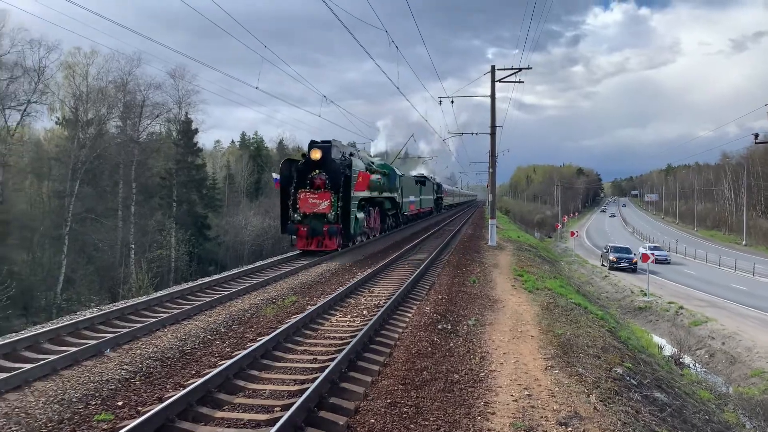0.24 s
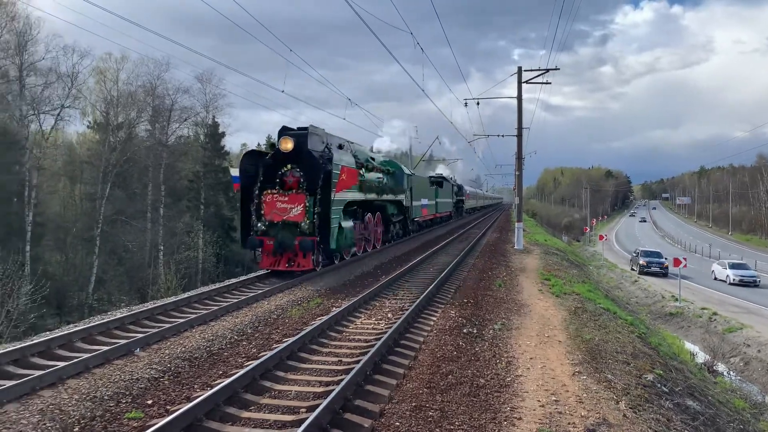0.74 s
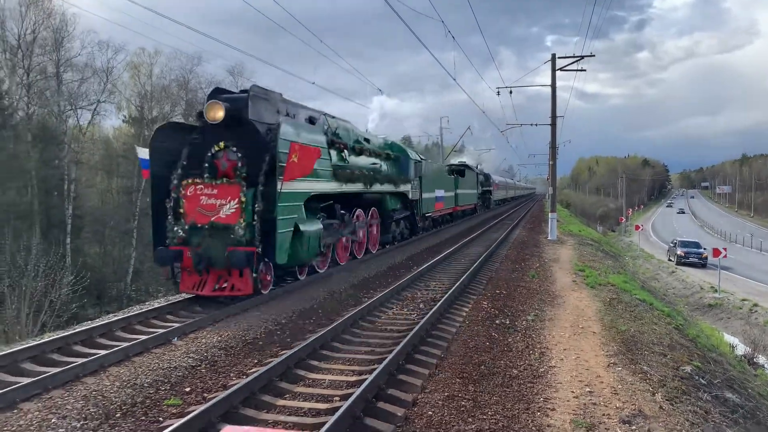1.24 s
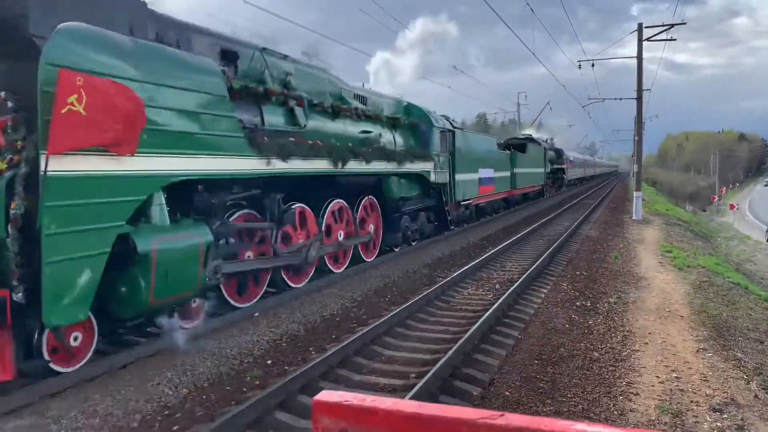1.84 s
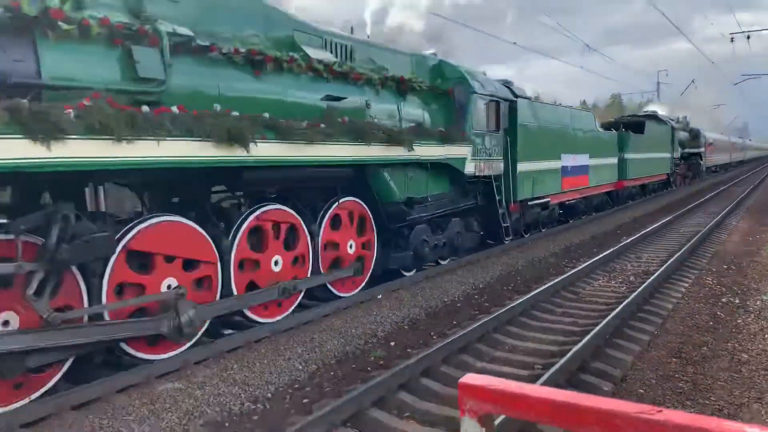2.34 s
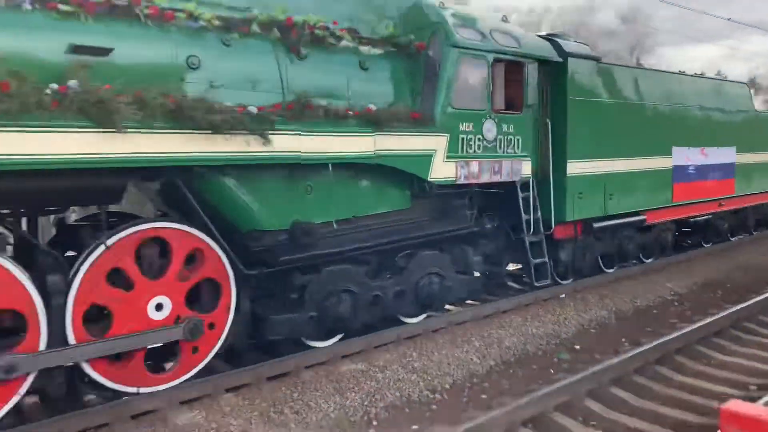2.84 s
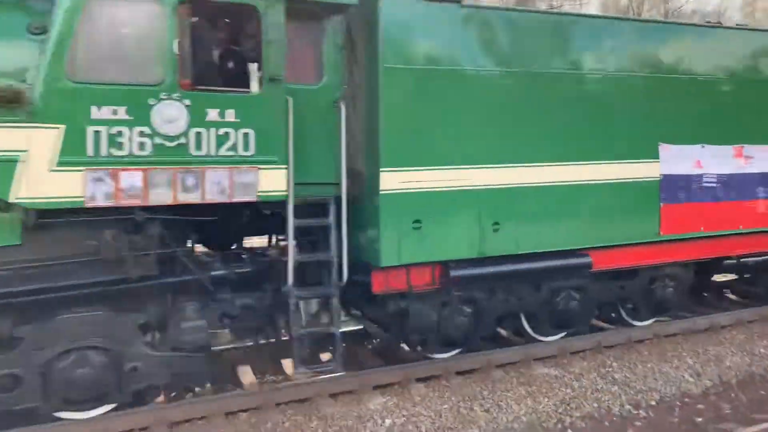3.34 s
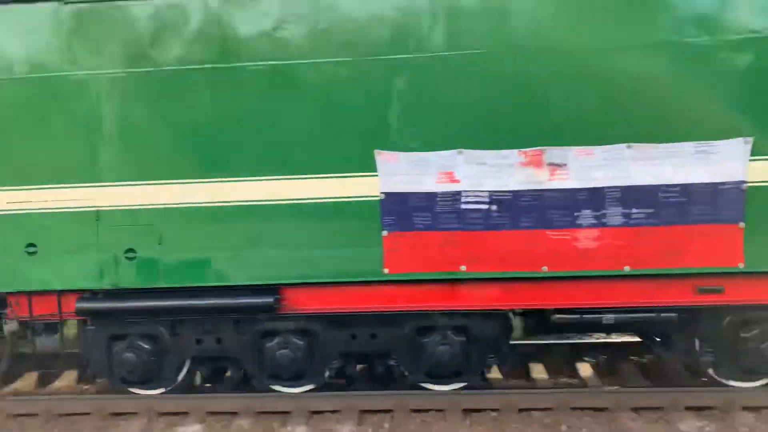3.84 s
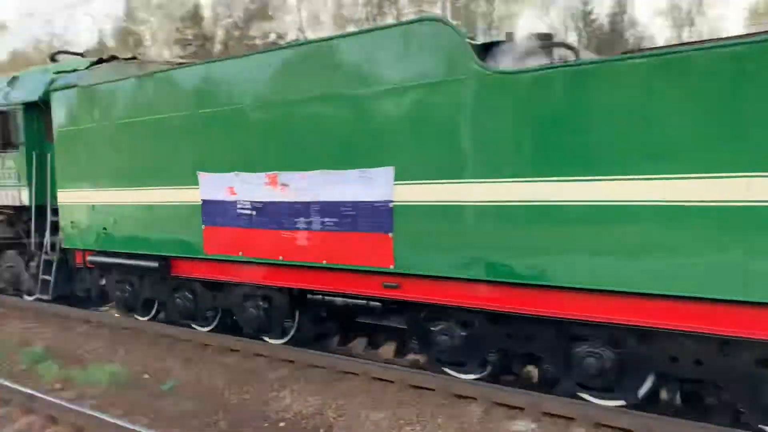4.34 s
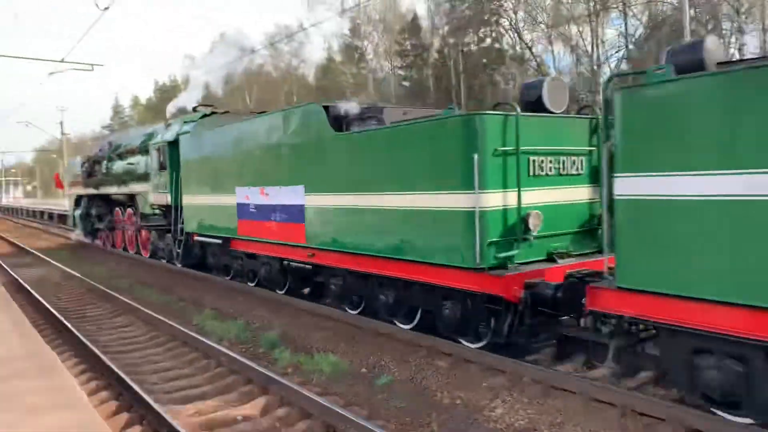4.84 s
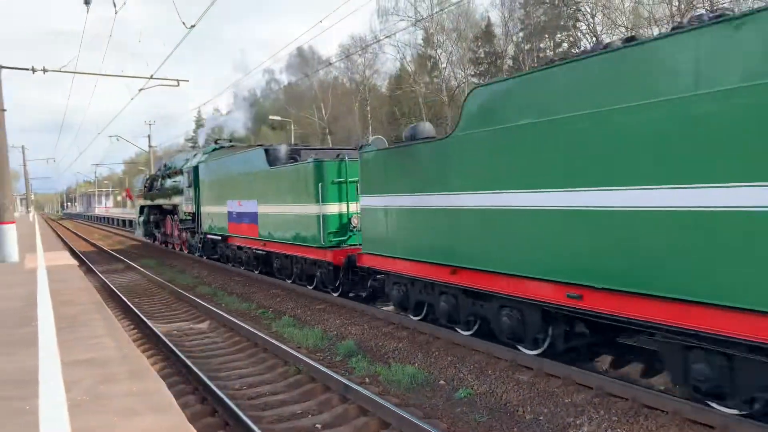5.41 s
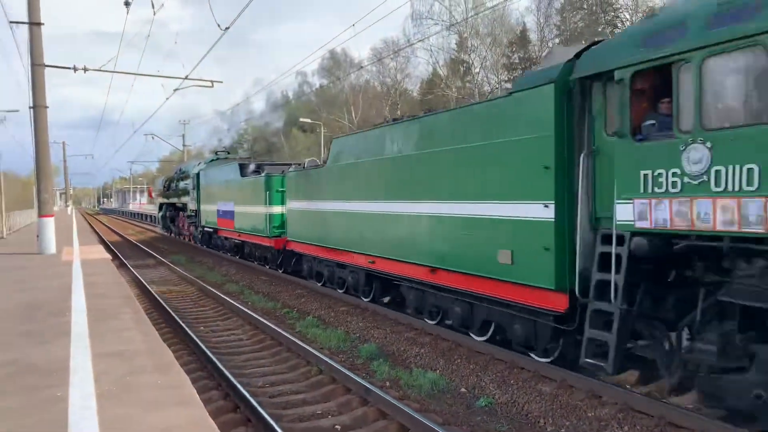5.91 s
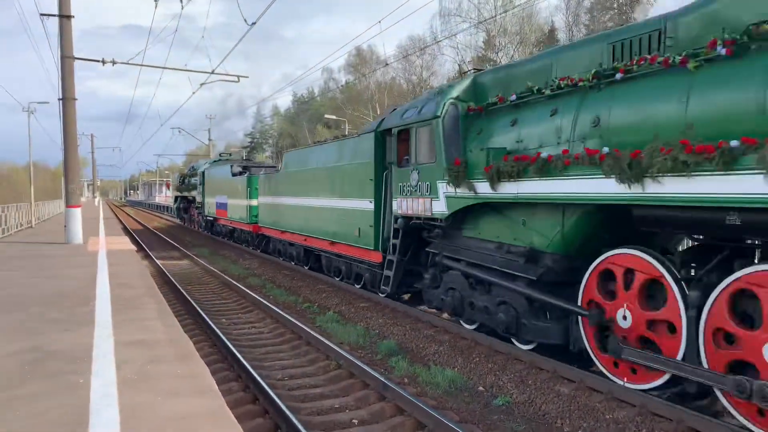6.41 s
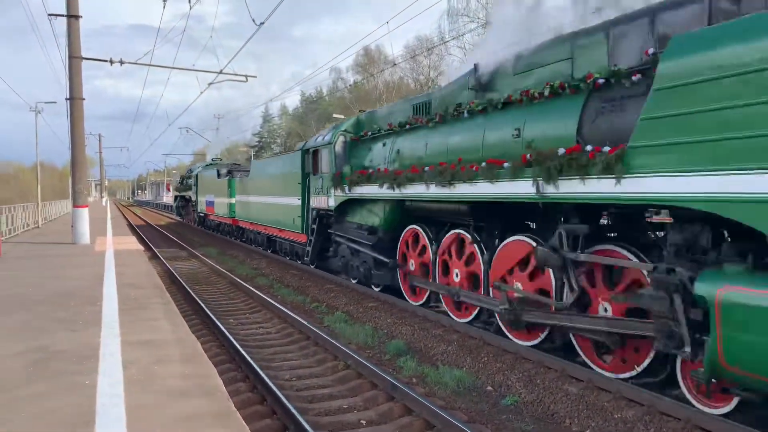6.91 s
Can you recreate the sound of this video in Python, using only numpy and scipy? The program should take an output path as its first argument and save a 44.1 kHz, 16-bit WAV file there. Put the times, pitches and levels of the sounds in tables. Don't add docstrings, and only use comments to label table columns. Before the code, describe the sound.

Open air by a railway platform, heard through a hand-held stereo phone turning with the train. At 0 s steam hiss is modest over a faint rumble, with a dull wheel thud almost at once. Uneven puffs build from 0.3 to 1.2 s, and the broadband hiss grows brighter and stronger toward 2.3 s. Rumble, rail hum and midrange rod clatter swell strongly; a sharp cluster of steam bursts lands around 2.5-2.6 s as the first driving wheels pass. From 3 to 5 s the sound stays dense: roaring steam, heavy rolling and irregular joint thuds, with a lower, fuller puff near 4.1 s and a broad one near 4.85 s. Another roaring puff comes around 5.8 s. Thuds bunch closely from 6.2 to 6.85 s as the second drivers clatter past, while the hiss recedes and the rolling eases by 7 s.

```python
import sys
import numpy as np
from scipy import signal
from scipy.io import wavfile
from scipy.ndimage import uniform_filter1d

SR = 44100
rng = np.random.default_rng(int(sys.argv[2]) if len(sys.argv) > 2 else 0)


def volts_from_db(level):
    exponent = np.asarray(level, float) / 20
    return 10 ** exponent


def materialize(psi):
    bounded = np.clip(np.atleast_2d(psi).T, -1, 1)
    quanta = np.round(bounded * 32767).astype(np.int16)
    wavfile.write(sys.argv[1], SR, quanta)


N = 315932

# time in seconds, lead of the jets at the left port in samples,
# lag of the wheels at the left port in samples.
PHONE_TURN = [(0.0, 4.3, 11), (0.6, 5.7, -2), (1.04, 7.7, -4), (1.55, 8.1, 2), (1.72, 11.9, 0),
              (2.09, 13.3, -0.6), (2.26, 18, -4), (2.44, 18, -3), (2.61, 20.8, -4.5), (3.48, 21.5, 0.5),
              (3.9, 20.1, 8), (4.35, 14, 14), (4.55, 11.9, 15.5), (4.78, 10.1, 15), (5.57, 7.93, 14),
              (6.1, 7.6, 19), (6.62, 8.7, 13.5), (7.16, 6.7, 10)]
# time in seconds, thud rise in dB, rail hum rise in dB, clatter rise in dB.
RAIL_JOINTS = [(0.092, 11.5, 9, -6), (0.569, 3.5, 1, 0.5), (0.735, 1, 7, 0), (1.46, -5, 4, 4),
               (1.878, 3.5, 5, 3), (2.28, -2, 4, 5.5), (2.72, 5, 3, 6.5), (2.889, 3.5, 4, 4.5),
               (3.17, -2, 6, 4), (3.751, 1, 6, -1.5), (4.005, 5, -0.1, 2.8), (4.29, 3, 7.5, 1.8),
               (4.761, 5, 4, 2), (5.482, 1, 1.5, 0.5), (5.796, 7.5, 2, -3), (6.24, 4, 6, 1.5),
               (6.385, 3, 5.5, -1), (6.541, 3, 7, 0.5), (6.666, 0.5, 6.5, 1.5), (6.846, 7.5, 3, 0.5)]


def read(points, hz):
    f, value = np.transpose(points)
    return np.interp(np.log(hz + 1), np.log(f + 1), value)


def curves(rows, t):
    s, *columns = np.transpose(rows)
    return [np.interp(t, s, c) for c in columns]


def bumps(t, at, rise_db, width):
    return sum(db * np.exp(-.5 * ((t - s) / w) ** 2) for s, db, w in zip(at, rise_db, width))


def bell(x, centre, width):
    return np.exp(-.5 * ((x - centre) / width) ** 2)


def drift(shape, bins, frames):
    field = rng.standard_normal(shape)
    field = uniform_filter1d(uniform_filter1d(field, bins, 0), frames, 1)
    return field / field.std()


def stft_axes(size):
    hop = size // 4
    return np.fft.rfftfreq(size, 1 / SR)[:, None], np.arange(-(-N // hop) + 1) * hop / SR


def at_ports(size, colour, band, field_db, cross, right_db=0):
    hz = stft_axes(size)[0]
    overlap = size - size // 4
    shape = volts_from_db(read(colour, hz))
    in_band = (hz > band[0]) & (hz < band[1])
    shape = shape / np.sqrt(np.sum(shape[in_band] ** 2) / len(hz))
    shared, own = signal.stft(rng.standard_normal((2, N)), nperseg=size, noverlap=overlap)[2]
    cross = cross / np.maximum(abs(cross), 1)
    left = cross * shared + np.sqrt(abs(1 - abs(cross) ** 2)) * own
    pair = np.array([left, shared * volts_from_db(right_db)])
    return signal.istft(pair * shape * volts_from_db(field_db), nperseg=size, noverlap=overlap)[1][:, :N]


def steam_levels(t):
    # time in seconds, jet level in dB, how squarely the jet blows at the phone from 0 to 1.
    jet_path = [(0.0, -39, 0.05), (0.3, -33, 0.07), (0.56, -34, 0.4), (0.8, -28.5, 0.36), (1.0, -35.5, 1),
                (1.4, -28.5, 0.9), (1.82, -26.5, 1), (2.3, -24.5, 0.64), (2.62, -29, .9),
                (3.2, -27.5, 0.75), (3.5, -26.5, 0.48), (3.85, -26.5, 0.9), (4.08, -24, 0.5),
                (4.6, -32, 0.3), (5.1, -26, 0.48), (5.7, -31, 0.3), (6.4, -35.5, .1), (7.16, -42.5, 0.24)]
    jet_db, facing = curves(jet_path, t)
    over_db = jet_db + 30
    roar_follows, ring_follows = 0.39, 0.86
    roar_db = -4.5 - (1 - roar_follows) * over_db
    aside_db, facing_db = -18.5, -2
    air_db = aside_db + (facing_db - aside_db) * facing
    lost = bell(curves(PHONE_TURN, t)[0], 17.3, 1.64)
    ring_db = 15.5 - (1 - ring_follows) * over_db - 6 * lost
    return jet_db, roar_db, air_db, ring_db


def jet_turn(hz, t):
    # frequency in Hz, radians the phone's body adds to the left lead.
    body_phase = [(300, -1.5), (900, -0.95), (2400, -1.41), (4500, -1.12), (5300, -0.82), (6000, -0.7),
                  (6900, 0.9), (7700, 2.9), (8300, 3), (9600, 3.5), (10500, 5), (11000, 8)]
    # frequency in Hz, likeness carried by the direct path.
    direct_path = [(600, 0.62), (1200, 0.47), (1800, 0.69), (2800, 0.81), (4000, 0.7), (4500, 0.67),
                   (5200, 0.5), (6200, 0.17), (7200, .35), (8600, 0.53), (10000, 0.47), (11200, 0.29)]
    # frequency in Hz, signed likeness that does not turn with the phone.
    case_path = [(2000, 0.13), (3300, -0.0035), (4200, 0.39), (4600, 0.019), (5100, -0.37), (5500, 0.04),
                 (6150, 0.84), (6600, 0.021), (7200, -0.56), (8000, 0.23), (9000, -0.05), (9700, 0.25),
                 (10600, 0.19), (11100, -0.22)]
    # time in seconds, how much one jet stands out as a factor on the direct path.
    focus = [(0, 0.82), (.5, 0.78), (.8, 1.0), (1.3, 1.1), (1.7, 0.75), (2.0, 1.12), (2.3, 0.84),
             (2.6, 1.03), (3.5, 1.03), (3.9, 1), (4.15, 1.31), (4.62, .92), (4.85, 1.25), (5.3, 1.18),
             (5.7, 0.83), (6.2, 0.98), (7.16, 0.82)]
    top_flips = (11216, 12660, 14320)

    early = curves(PHONE_TURN, t)[0]
    shortcut_hz, shortcut_lead, shortcut_per_khz = 7400, 8.8, 0.04
    bent = early - (early - shortcut_lead) * shortcut_per_khz * np.maximum(hz - shortcut_hz, 0) / 1000
    lead = 2 * np.pi * hz * bent / SR + read(body_phase, hz)
    both = curves(focus, t)[0] * read(direct_path, hz) * np.exp(1j * lead) + read(case_path, hz)
    edge_on = np.clip((12 - early) / 3, 0, 1)
    both = both + 0.33 * edge_on * bell(hz, 10400, 360)

    waver = 1 + .12 * drift(lead.shape, bins=4, frames=12)
    wander_hz, blur_hz = 110, 300
    slow = round(t.size / 150) + 1
    first, *upper = [f + wander_hz * drift((1, len(t)), bins=1, frames=slow) for f in top_flips]
    top = -.8 * np.prod([np.tanh((f - hz) / blur_hz) for f in upper], axis=0)
    return waver * np.where(hz < first, both, top)


def steam():
    # frequency in Hz, level of the jet noise in dB.
    steam_colour = [(900, -10), (1500, -5), (2300, 1.5), (3500, 1.5), (4600, 1), (6000, -0.5), (7600, -3.5),
                    (9500, -2), (11000, -4), (13000, -4.5), (14500, -9.5), (15600, -7.5)]
    # time in seconds, jet rise in dB, roar rise in dB, width in seconds.
    puff_rows = [(0.287, 7, -2.5, 0.031), (0.447, 6, -1.5, 0.072), (0.571, 5.5, -1, 0.043),
                 (0.933, 5, 2.5, 0.026), (1.034, 4, 1.5, 0.18), (1.187, 4, 1.5, 0.034),
                 (1.556, 1.4, 1.1, 0.034), (1.801, 3, 0.7, 0.084), (1.846, 3.5, -1.5, 0.033),
                 (2.354, 2.5, -1, 0.025), (2.494, 6, 0, 0.046), (2.539, 11, -1, 0.013),
                 (2.613, 9.5, 0, 0.033), (2.755, 2, 1, 0.13), (2.911, 3, 5.5, 0.024),
                 (3.293, 3, 5.5, 0.027), (3.497, 2, 5.5, 0.068), (3.759, 1, 4, 0.088),
                 (3.903, 4.5, 3.5, 0.036), (4.094, 3.5, 8.5, 0.081), (4.192, 4, 6, 0.035),
                 (4.543, 3, 2, 0.082), (4.846, 7.5, 4.5, 0.14), (5.041, 0, 3.5, 0.12), (5.283, -1, 2, 0.11),
                 (5.785, 1.5, 7, 0.15), (6.05, 1, -0.5, 0.12), (6.214, 3.5, 0, 0.034),
                 (6.501, 4.5, 1.5, 0.065), (6.844, 0.5, 2, 0.061)]
    # frequency in Hz, share of the right port's ring.
    port_ring = [(1000, 0.1), (7000, 0.083), (7930, 0.035), (8080, 0.95), (9100, 0.79), (9900, 0.31),
                 (10600, 0.18), (11200, 0)]

    hz, t = stft_axes(size=512)
    shape = (len(hz), len(t))
    jet_db, roar_db, air_db, ring_db = steam_levels(t)
    low = read([(2600, 1.0), (4200, 0.25)], hz)
    high = read([(7000, 0.19), (12000, 0.77)], hz)

    s, jet_rise, roar_rise, width = np.transpose(puff_rows)
    jet_puffs = bumps(t, s, jet_rise, 0.35 * width)
    roar_puffs = bumps(t, s, roar_rise, 0.41 * width)
    puffs = (1.2 - 0.51 * high) * ((1 - low) * jet_puffs + low * roar_puffs)

    flutter = 0.8 * drift((1, len(t)), bins=1, frames=9) + 0.3 * drift(shape, bins=30, frames=9)
    patches = 0.88 * drift(shape, bins=5, frames=40) + 2.13 * drift(shape, bins=2, frames=10)
    field_db = jet_db - 0.78 + low * (roar_db + 2.5) + high * (air_db + 6.0)
    field_db = field_db + puffs + flutter + patches

    widen = 1 + 0.039 * (curves(PHONE_TURN, t)[0] - 8)
    ring_hz = np.where(hz > 8500, 8500 + (hz - 8500) / widen, hz)
    ring = ring_db * read(port_ring, ring_hz)
    return at_ports(512, steam_colour, (3500, 7500), field_db, jet_turn(hz, t), ring)


def wheel_levels(t):
    # time in seconds, load on the near rail in dB.
    rail_load = [(0.0, -45.5), (0.22, -53), (0.6, -46), (0.85, -48), (1.4, -41.5), (1.6, -40.5),
                 (1.85, -39), (2.4, -31.5), (2.8, -31), (3.1, -31.5), (3.5, -31.5), (4.4, -31.5),
                 (4.85, -30), (5.7, -32.5), (6.2, -33.5), (7.16, -41)]
    # time in seconds, strength, half length in seconds.
    drivers = [
        (2.724, 1, 0.77),
        (6.9, 0.63, 0.65),
    ]
    rail_db = curves(rail_load, t)[0]
    over_db = rail_db + 30
    s, strength, half = np.transpose(drivers)
    rumble_db = -35 + 0.64 * over_db + bumps(t, s, 6 * strength, 1.33 * half)
    clatter_db = -39 + 0.46 * over_db + bumps(t, s, 6 * strength, half)
    return rumble_db, rail_db, clatter_db, curves(PHONE_TURN, t)[1]


def rolling():
    # frequency in Hz, level in dB; for frames, rails and rods.
    rumble_colour = [(20, -34), (35, -1), (52, 3), (120, -1.5), (160, -2.5), (230, -8), (600, -79)]
    rail_colour = [(50, -50), (100, -13), (150, -4), (220, 1), (380, 3), (430, -4.5), (480, -9), (600, -24),
                   (1500, -67)]
    clatter_colour = [(100, -50), (330, -50), (470, 3.5), (650, 4), (1000, 5.5), (1350, 2.5), (1800, 0.5),
                      (3000, -46), (8000, -70)]
    # frequency in Hz, left-right likeness of the wheels.
    alike = [(40, 0.93), (150, 1), (400, 0.97), (1200, 0.5), (3000, 0.57)]
    # time in seconds, dB the ground echo cancels around 500 Hz while the train is far.
    ground_dip = [(0, 2.5), (1, 8.5), (2, 2.5), (2.6, -2), (7.16, -2)]

    hz, t = stft_axes(size=2048)
    rumble_db, rail_db, clatter_db, late = wheel_levels(t)
    behind = read(alike, hz) * np.exp(-1j * (2 * np.pi * hz * late / SR + 0.15))
    rear = np.clip(late / 24, .05, .95)
    dip = curves(ground_dip, t)[0] * (.4 - bell(np.log2((hz + 1) / 500), 0, 0.43))
    patches = 1.23 * drift((len(hz), len(t)), bins=5, frames=8) + dip

    rumble = at_ports(2048, rumble_colour, (40, 150), rumble_db - .8 + patches, behind, -1.3)
    rail = at_ports(2048, rail_colour, (150, 450), rail_db - .6 + patches, behind)
    rattling_db = clatter_db - .9 + patches + 3.16 * drift(patches.shape, bins=3, frames=2)
    rods = rear * behind + (1 - rear) * jet_turn(hz, t)
    clatter = at_ports(2048, clatter_colour, (500, 1400), rattling_db, rods, 0.13)

    s, _, hum, rattle = np.transpose(RAIL_JOINTS)
    clock, same = np.arange(N) / SR, np.ones(len(s))
    rail_swell = volts_from_db(bumps(clock, s, 0.82 * hum, 0.0097 * same))
    clatter_swell = volts_from_db(bumps(clock, s, 1.32 * rattle, 0.02 * same))
    return rumble + rail * rail_swell + clatter * clatter_swell


def joints():
    out, u = np.zeros((2, N)), np.arange(3000) / SR
    for (s, rise_db, *_), chance in zip(RAIL_JOINTS, rng.random((len(RAIL_JOINTS), 2))):
        rumble_db, *_, late = wheel_levels(s)
        hz = 70 + 40 * chance[0]
        swing = np.sin(2 * np.pi * hz * u) * (u / 0.0055) * np.exp(1 - u / 0.0046)
        size = volts_from_db(rumble_db + 9.5) * np.sqrt(max(volts_from_db(2 * rise_db) - 1, 0))
        for side, delay in enumerate((late + 5, 0)):
            start = max(round((s - .009) * SR + delay), 0)
            part = out[side, start:start + len(u)]
            part += size * swing[:len(part)]
    return out


def thin_spectrum(x):
    # frequency in Hz, dB under its partner at which mid or side is dropped.
    partner_gap = [(1200, 20), (2000, 8.5), (5000, 7), (7600, 6), (8000, 20), (9600, 20), (10100, 6.5),
                   (11300, 5), (14000, 5)]
    # frequency in Hz, dB against the mean hiss under which a band is dropped.
    mask_floor = [(9000, -34), (12500, -29), (14000, -22), (14500, -22), (15200, -21.5), (15500, -17),
                  (15800, -11)]
    # frequency in Hz, dB against the band mean under which a line falls to zero.
    line_floor = [(700, -22), (1200, -9), (2600, -9), (4000, -8), (7500, -9), (8000, -26), (9800, -26),
                  (10600, -9), (11500, -4), (13000, 0), (15000, 1)]

    mid_side = np.array([x[0] + x[1], x[0] - x[1]]) / 2
    hz, _, z = signal.stft(mid_side, SR, "cosine", 2048, 1024)
    band = np.cumsum(np.where(hz < 7000, 1 / 12, 1 / 16)).astype(int)
    starts = np.flatnonzero(np.diff(band, prepend=-1))
    power = abs(z) ** 2
    band_power = np.add.reduceat(power, starts, axis=1) / np.bincount(band)[:, None]
    band_db = 10 * np.log10(band_power + 1e-20)
    hiss = (hz > 3000) & (hz < 10000)
    hiss_db = 10 * np.log10(power[:, hiss].mean((0, 1)) + 1e-20)

    keep = band_db > band_db[::-1] - read(partner_gap, hz[starts])[:, None]
    unsure_db = 4.5 * rng.standard_normal(band_db.shape)
    keep &= band_db > hiss_db + read(mask_floor, hz[starts])[:, None] + unsure_db
    lines = abs(z) > volts_from_db(band_db.max(0)[band] + read(line_floor, hz)[:, None])
    mid, side = signal.istft(z * keep[:, band] * lines, SR, "cosine", 2048, 1024)[1][:, :N]
    return np.array([mid + side, mid - side])


def scene():
    return steam() + rolling() + joints()


def low_pass(x):
    return signal.sosfilt(signal.butter(12, 15810, fs=SR, output="sos"), x)


def record(dry):
    bass_cut = signal.butter(5, 38, "high", fs=SR, output="sos")
    mix = thin_spectrum(signal.sosfilt(bass_cut, dry))
    return low_pass(mix)


dry = scene()
out = record(dry)
materialize(out)
```